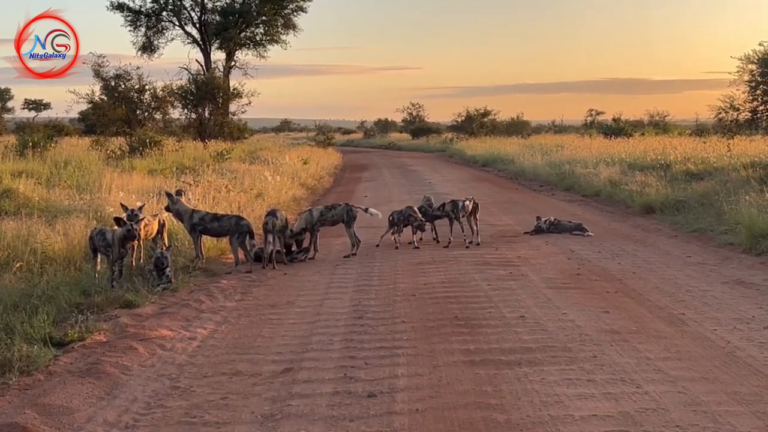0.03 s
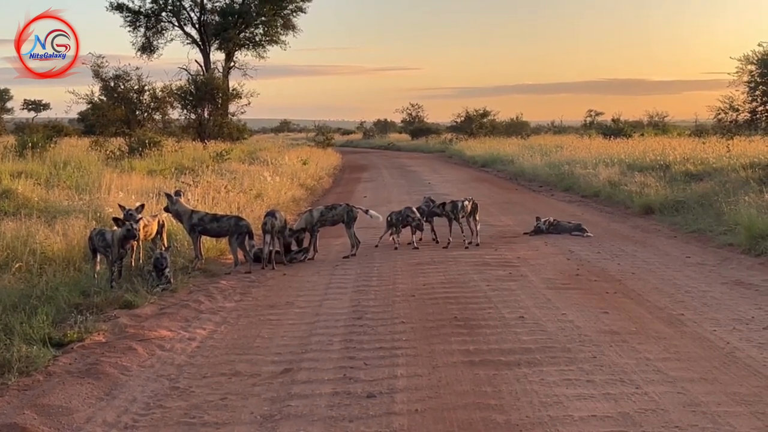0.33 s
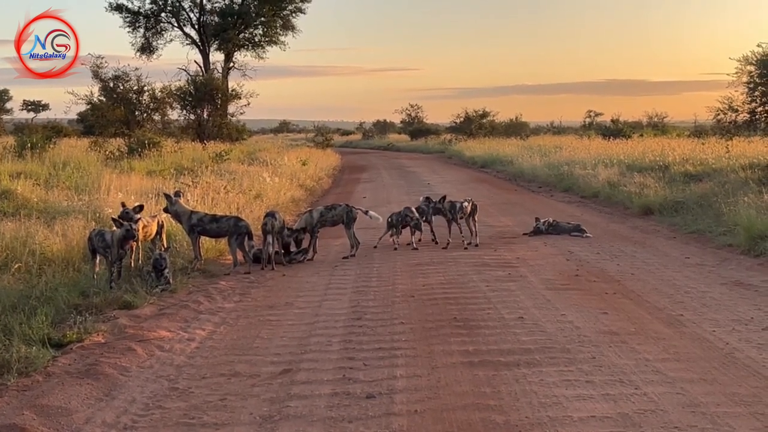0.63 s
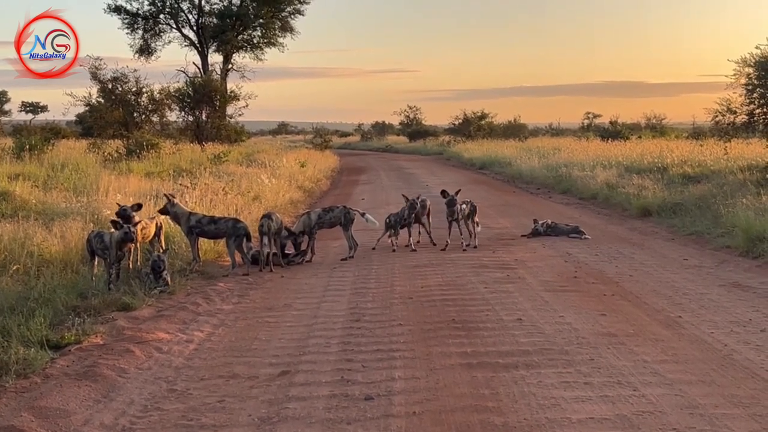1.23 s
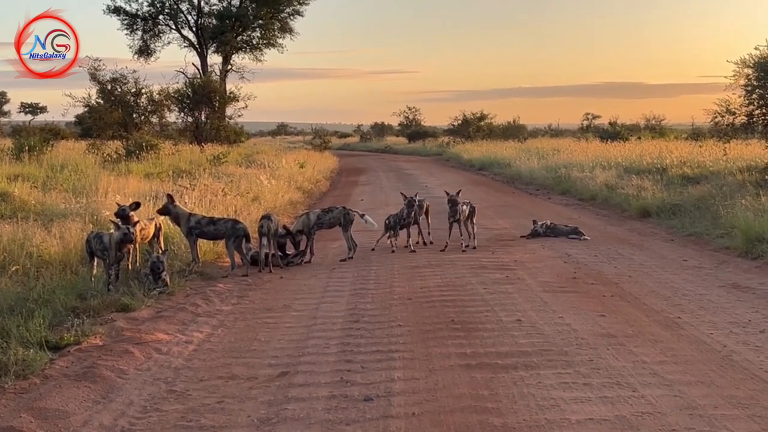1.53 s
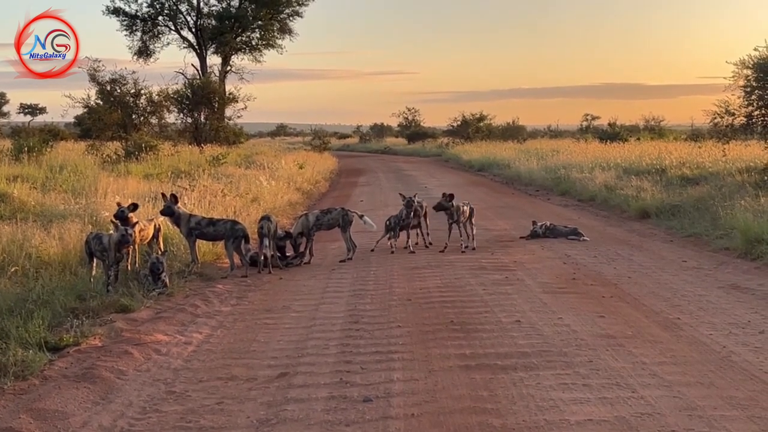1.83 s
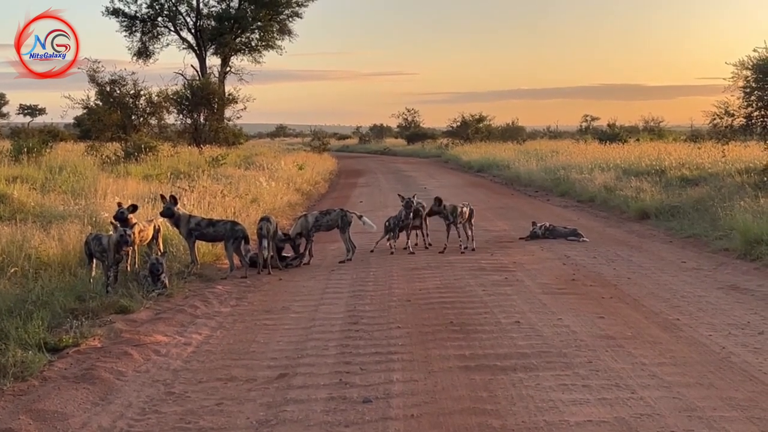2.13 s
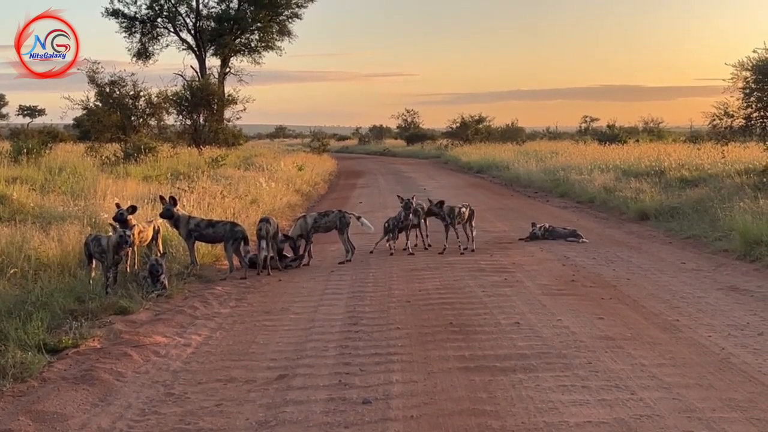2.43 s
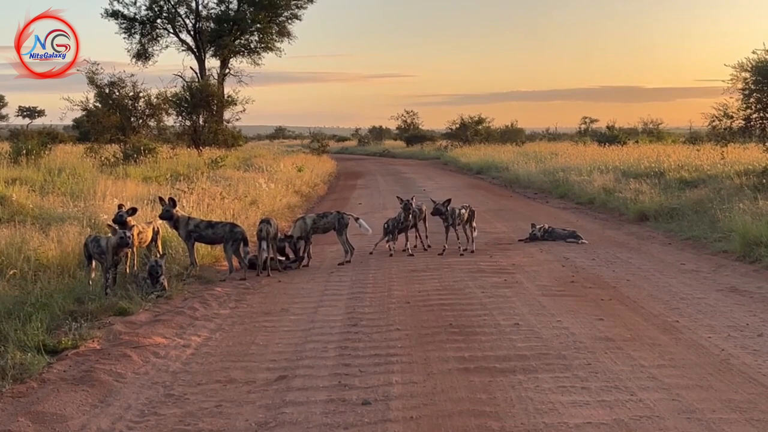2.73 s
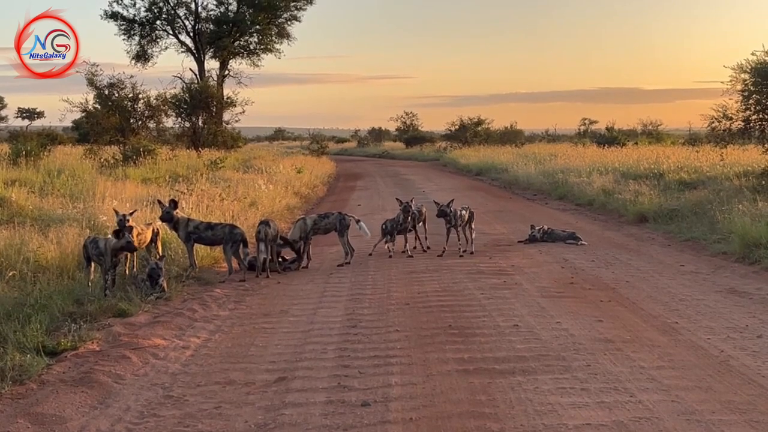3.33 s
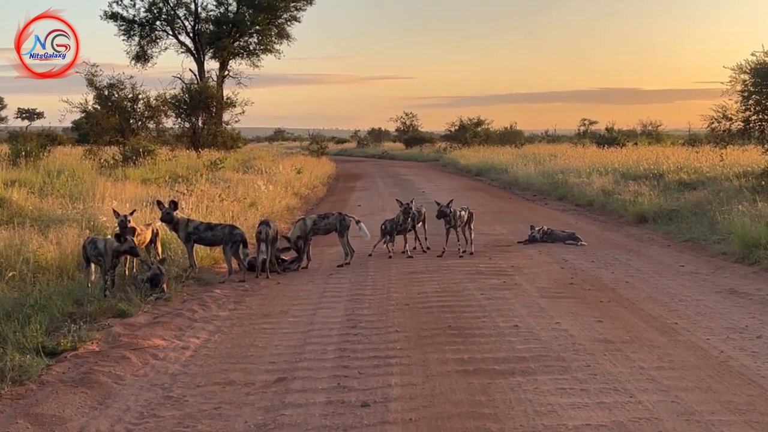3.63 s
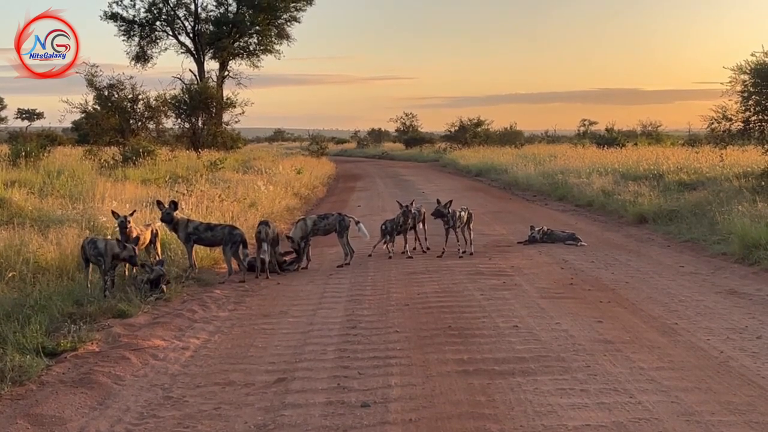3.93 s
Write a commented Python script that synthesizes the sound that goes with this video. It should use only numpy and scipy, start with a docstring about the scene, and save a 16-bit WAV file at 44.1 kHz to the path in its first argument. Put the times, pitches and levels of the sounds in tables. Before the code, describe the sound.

Birdsong with high falling whistles and quick trills in open grassland, with light wind.

```python
"""Birdsong in open grassland

Beside a dirt road, birds sing frequency-modulated tones: small slurred notes, fast trills, steep
falling whistles and one loud warble, with a few noisy rasps. Grass and bushes scatter each call back.
Under them lie a far chorus, faint wind and a low hum like that of an idling vehicle."""
import sys
import numpy as np
from scipy import signal
from scipy.fft import rfft, irfft
from scipy.io import wavfile
from scipy.ndimage import uniform_filter1d, map_coordinates

SR = 44100
rng = np.random.default_rng(int(sys.argv[2]) if len(sys.argv) > 2 else 0)


def int16_out(signal):
    """Quantize to a 16-bit WAV file."""
    q = np.round(np.clip(np.atleast_2d(signal).T, -1, 1) * 32767)
    wavfile.write(sys.argv[1], SR, q.astype(np.int16))


N = 176400

# Noise spectra. Each row: frequency in Hz, relative level in dB.
WIND_SPECTRUM = [(20, -43), (42, -7.5), (64, 2.5), (100, -3.5), (266, -19), (440, -19.5), (650, -21.5),
                 (1070, -25.5), (2030, -29.5), (3080, -31), (3700, -34.5), (4800, -29.5), (5700, -38.5),
                 (8160, -46.5), (10500, -50.5), (12700, -46.5), (14500, -53), (15600, -77)]
MURMUR_SPECTRUM = [(300, -19), (650, -14), (850, 7), (1050, -6.5), (1500, -31)]
RASP_SPECTRUM = [(300, -34), (1500, -4.5), (2600, -5), (3400, 6), (4000, 3.5), (4700, 0), (6800, -4.5),
                 (8500, -20), (15000, -26)]
SHEEN_SPECTRUM = [(9000, -40), (11000, -12), (12300, 18), (14200, -8), (15600, -18)]
# Swells of the midrange murmur. Each row: time in seconds, level in dB.
MURMUR_LEVEL = [(0, -56.5), (.3, -56), (.75, -65), (.9, -55), (1.149, -66), (1.46, -56.5), (1.9, -64.5),
                (2.35, -59), (2.6, -64), (3.0, -58.5), (3.4, -67.5), (4, -61.5)]
# Registers of the far chorus. Each row: centre pitch in Hz, spread as a fraction of it,
# notes per second, note length in seconds, level of the register in dB.
CHORUS_REGISTERS = [(4710, 0.0657, 70, 0.0177, -64.5), (3000, 0.3, 26, .08, -65),
                    (6000, 0.121, 110, 0.0203, -74)]
# Scratchy calls. Each row: start in seconds, length in seconds, level in dB.
RASP_CALLS = [(0.046, 0.049, -48), (0.326, 0.065, -51), (1.057, 0.024, -47.5), (1.321, 0.025, -49)]
# Slurs and thin high notes. Each row: start and length in seconds, first, middle and last pitch in Hz,
# level in dB.
SLURRED_NOTES = [ (.06, 0.049, 3520, 3290, 2860, -54.5), (.198, 0.031, 4740, 4390, 3900, -52.5),
                 (.345, 0.11, 3450, 2940, 2630, -60.5), (.465, .065, 3080, 3144, 2900, -55.5),
                 (.53, 0.035, 3530, 3480, 3300, -46.5), (.62, 0.075, 3120, 2755, 2570, -57.5),
                 (.654, 0.02, 3900, 3650, 3490, -51), (.70, 0.24, 2410, 2220, 2280, -67),
                 (.752, 0.043, 4730, 4210, 3970, -53.5), (.915, 0.063, 3980, 3440, 2780, -53.5),
                 (2.286, 0.027, 2480, 2390, 2310, -57.5), (2.505, 0.06, 3760, 3560, 3230, -55.5),
                 (2.585, 0.11, 2278, 2336, 2216, -56.5), (2.592, 0.033, 2200, 2900, 2930, -55.5),
                 (2.68, .13, 2290, 2130, 1900, -63.5), (2.852, 0.0597, 3420, 3240, 3000, -59.5),
                 (2.905, 0.076, 3070, 2910, 2520, -55), (3.005, 0.076, 2270, 2430, 2520, -59),
                 (3.112, .115, 3000, 3540, 3380, -53), (3.22, 0.1, 3950, 3790, 3300, -61.5),
                 (3.268, 0.043, 3480, 3380, 2870, -51.5), (3.335, 0.095, 3110, 2880, 2650, -58),
                 (3.432, .022, 2380, 2400, 2600, -59), (3.945, .09, 3050, 2850, 2870, -57.5),
                 (3.957, 0.04, 4970, 4300, 3375, -56)]
THIN_NOTES = [(0.186, 0.029, 5600, 6480, 6600, -58.5), (0.386, 0.045, 6000, 7000, 7000, -55.5),
              (0.531, 0.033, 6000, 7250, 5900, -57.5), (0.576, 0.034, 6100, 7130, 6050, -64),
              (0.652, 0.046, 6000, 6700, 5800, -64), (1.376, .01, 5800, 6260, 6870, -61),
              (1.456, 0.02, 6900, 7100, 7300, -60.5), (1.573, 0.012, 5800, 6260, 6800, -61),
              (1.631, 0.032, 6800, 7100, 7000, -61.5), (1.645, .024, 5800, 5800, 6140, -59),
              (1.781, 0.011, 5700, 6400, 6850, -62), (1.969, 0.03, 7400, 6000, 7530, -60.5),
              (2.055, 0.04, 7700, 6000, 7460, -61.5), (2.188, 0.011, 5700, 6580, 7060, -60),
              (2.389, 0.012, 5700, 6640, 7340, -61), (2.422, 0.01, 7900, 7340, 6400, -64),
              (2.716, 0.04, 5880, 6570, 6050, -66), (3.22, 0.16, 7600, 6710, 6210, -68)]
# Rising twitters. Each row: start and length in seconds, top pitch in Hz, level in dB.
TWITTER_NOTES = [(1.598, 0.033, 3460, -57), (1.707, 0.03, 3350, -53.5), (1.763, 0.019, 3660, -51),
                 (1.788, 0.017, 3550, -55), (1.828, .022, 3910, -57), (1.868, 0.044, 3370, -52),
                 (1.921, 0.041, 3645, -52.5), (1.988, 0.03, 3600, -54.5), (2.062, 0.031, 3400, -52.5),
                 (2.11, 0.028, 3590, -53.5)]
# Trills. Each row: start in seconds, number of chips (rounded in use), period and chip length in seconds,
# top and bottom pitch in Hz, level in dB.
TRILL_RUNS = [(0.144, 4, 0.03, 0.02, 5080, 4650, -51), (0.377, 11.7, 0.017, 0.021, 4560, 3800, -53.5),
              (0.432, 5.1, 0.033, 0.022, 4990, 4650, -52), (0.784, 3.9, 0.034, 0.019, 5040, 4650, -49),
              (1.491, 3, 0.033, 0.027, 5000, 4790, -57), (1.663, 10, .0193, 0.0118, 5370, 4300, -53.5),
              (2.051, 9.9, 0.021, 0.017, 4910, 4220, -60.5), (2.125, 3.2, 0.031, 0.022, 5050, 4690, -56.5),
              (2.7953, 9.9, 0.02, 0.017, 4670, 3950, -56.5), (2.8485, 7.2, .0209, 0.013, 5470, 4560, -57.5),
              (3.141, 12, 0.019, .014, 5020, 4640, -58.5), (3.4, 9.3, 0.021, 0.014, 4720, 3750, -54.5),
              (3.432, 6.7, 0.041, 0.019, 5040, 4770, -57), (3.695, 14, 0.018, 0.0109, 5310, 4560, -54),
              (3.725, 7.3, 0.032, 0.029, 5010, 4600, -55.5)]
# Steep whistles, and flatter ones that drop at the end. Each row: start and length in seconds,
# base level in dB.
STEEP_WHISTLES = [(.572, 0.14, -38), (.828, 0.15, -34), (1.094, 0.14, -31.5)]
DROPPING_WHISTLES = [(2.212, 0.13, -52.5), (2.992, 0.15, -48.5), (3.79, .138, -50)]
# Their contours. Each row: fraction of the length, pitch in Hz, level in dB relative to the base.
STEEP_CONTOUR = [(0, 6780, -25), (.2, 6250, -26), (.3, 5940, -19), (.44, 5600, -13.5), (.6, 5180, -24),
                 (.74, 4940, -8), (.88, 4620, -6), (1, 4110, -11.5)]
DROPPING_CONTOUR = [(0, 5250, -10), (.3, 4790, -2.5), (.68, 4650, -5.5), (.79, 4520, -6), (1, 3750, -6.5)]
# The loud warble. Each row: time in seconds, centre pitch in Hz, pitch swing in Hz, level in dB.
WARBLE_CONTOUR = [(1.328, 2730, 324, -42), (1.341, 3017, 314, -38.5), (1.362, 2962, 302, -42),
                  (1.39, 3036, 266, -39), (1.429, 3102, 235, -38.5), (1.484, 3013, 200, -40.5),
                  (1.519, 3034, 141, -36), (1.535, 3060, 139.7, -52), (1.553, 2997, 138, -37.5),
                  (1.588, 2870, 108, -44)]

WIND_DB, HUM_DB, HUM_HZ, HUM_WAVER_HZ, HUM_FLUTTER = -45.5, -52, 82.85, 0.98, 0.24
EDGE_S, PITCH_JITTER, JITTER_PER_S, FLICKER_PER_S = 0.0017, 0.0057, 389, 195.3
TRILL_START_DB, TRILL_SLIP_S, TRILL_UNEVEN_DB, TRILL_DETUNE = -1.5, .0007, 1.3, 0.0077
WARBLE_RATE_HZ, WARBLE_CREST_S, WARBLE_SQUARENESS, WARBLE_STROKE_DB = 23.2, 0.0095, 1.17, 1.5
WARBLE_ECHO_S, WARBLE_ECHO_DB, NEAR_SCATTER_DB = 0.0044, -13.5, -3.5
SCATTER_DB, SCATTER_T60_S, FAR_DB, FAR_T60_S = -6, 0.16, -13.5, 0.92
SHEEN_DB, SHEEN_FOLLOWS_ABOVE_HZ, SHEEN_SMOOTH_S = -29.5, 7300, .004
CUTOFF_HZ = 15650


def amp(db):
    """Amplitude grows tenfold for every 20 dB."""
    return 10 ** (np.asarray(db) / 20)


def unit(x):
    """Normalisation scales a signal to rms 1."""
    return x / np.sqrt(np.mean(x ** 2) + 1e-20)


def add(mix, start, sound):
    """Superposition: a sound adds to the mix from its start in seconds."""
    part = mix[max(round(start * SR), 0):][:len(sound)]
    part += sound[:len(part)]


def drift(n, rate):
    """Random modulation: a smooth curve of size about 1 through `rate` random values a second."""
    knots = rng.standard_normal(1024)
    return map_coordinates(knots, [np.arange(n) * rate / SR], order=3, mode="wrap")


def noise(spectrum):
    """Spectral shaping gives white noise a colour, at rms 1."""
    hz, db = np.transpose(spectrum)
    bins_hz = np.fft.rfftfreq(N, 1 / SR)
    gain = amp(np.interp(np.log(bins_hz + 1), np.log(hz), db))
    return unit(irfft(rfft(rng.standard_normal(N)) * gain, N))


def whistle(hz, gain, flicker_db):
    """Phase is the integral of frequency: a slightly unsteady, near-pure tone follows a pitch curve."""
    n = len(hz)
    t = np.arange(n) / SR
    edges = np.clip(np.minimum(t, t[-1] - t) / EDGE_S, 0, 1)
    phase = 2 * np.pi * np.cumsum(hz * (1 + PITCH_JITTER * drift(n, JITTER_PER_S))) / SR
    flicker = amp(flicker_db * np.tanh(drift(n, FLICKER_PER_S)))
    return np.sqrt(2) * gain * edges * flicker * np.sin(phase)


def slur(length, first, middle, last, db):
    """A frequency glide: a parabola through three pitches, under an arched envelope."""
    u = np.linspace(0, 1, max(int(length * SR), 64))
    bow = (middle - (first + last) / 2) * (1 - (2 * u - 1) ** 2)
    arch = abs(np.sin(np.pi * u)) ** 0.26
    return whistle(first * (1 - u) + last * u + bow, amp(db) * arch, flicker_db=2)


def wind():
    """Moving air is broadband noise: a faint bed and a midrange murmur, each slowly modulated."""
    air = amp(WIND_DB + 0.93 * drift(N, 9)) * noise(WIND_SPECTRUM)
    swell_db = np.interp(np.arange(N) / SR, *np.transpose(MURMUR_LEVEL))
    return air + amp(swell_db + 2.85 * drift(N, 12)) * noise(MURMUR_SPECTRUM)


def hum():
    """Random frequency and amplitude modulation make a low tone waver like an idling engine."""
    phase = 2 * np.pi * np.cumsum(HUM_HZ + HUM_WAVER_HZ * drift(N, 11.75)) / SR
    return amp(HUM_DB) * unit((1 + HUM_FLUTTER * drift(N, 16)) * np.sin(phase))


def far_chorus():
    """Incoherent summation: random chirps of far birds blend in three registers."""
    out = np.zeros(N)
    for hz, spread, rate, length, db in CHORUS_REGISTERS:
        voices = np.zeros(N)
        for when, pitch, bend, faintness in rng.random((int(rate * N / SR), 4)):
            middle = hz * (1 + spread * (2 * pitch - 1))
            fall = 0.1033 * bend - .03
            chirp = slur(length, middle * (1 + fall), middle, middle * (1 - fall), -8 * faintness)
            add(voices, when * N / SR, chirp)
        out += amp(db) * unit(voices)
    return out


def rasps():
    """Aperiodic sound has no pitch: these calls are noise bursts that rise faster than they fade."""
    envelope, hiss = np.zeros(N), noise(RASP_SPECTRUM)
    for start, length, db in RASP_CALLS:
        u = np.linspace(0, 1, int(length * SR))
        add(envelope, start, amp(db) * np.sin(np.pi * u ** 0.53))
    return envelope * hiss


def small_notes():
    """Brief frequency glides make the slurs, thin notes and twitters of birds further off."""
    out = np.zeros(N)
    for start, *note in SLURRED_NOTES + THIN_NOTES:
        add(out, start, slur(*note))
    for start, length, top, db in TWITTER_NOTES:
        add(out, start, slur(length, .89 * top, .98 * top, top, db))
    return out


def trills():
    """A trill is a quasi-periodic pulse train: uneven falling chips reach full strength by mid-run."""
    out = np.zeros(N)
    for start, count, period, length, top, bottom, db in TRILL_RUNS:
        pitches = np.array([top, top + 0.353 * (bottom - top), bottom])
        for k, (slip, size, detune) in enumerate(rng.standard_normal((round(count), 3))):
            onset_db = TRILL_START_DB * max(1 - 2 * (k + .5) / count, 0)
            level = db + onset_db + TRILL_UNEVEN_DB * size
            chip = slur(length, *(pitches * (1 + TRILL_DETUNE * detune)), level)
            add(out, start + k * period + TRILL_SLIP_S * slip, chip)
    return out


def falling_whistles(calls, contour, flicker_db):
    """A downward frequency sweep: one bird repeats a contour, stretched to each call's length."""
    out = np.zeros(N)
    fraction, hz, db = np.transpose(contour)
    for start, length, base_db in calls:
        u = np.linspace(0, 1, int(length * SR))
        gain = amp(base_db + np.interp(u, fraction, db))
        add(out, start, whistle(np.interp(u, fraction, hz), gain, flicker_db))
    return out


def warble():
    """Interference: a whistle with a fast, narrowing vibrato beats against one close reflection."""
    out = np.zeros(N)
    times, centre, swing, db = np.transpose(WARBLE_CONTOUR)
    start = times[0]
    t = np.arange(start, times[-1], 1 / SR)
    cycle = 2 * np.pi * WARBLE_RATE_HZ * (t - start - WARBLE_CREST_S)
    vibrato = np.tanh(WARBLE_SQUARENESS * np.cos(cycle)) / np.tanh(WARBLE_SQUARENESS)  # dwells at turns
    hz = np.interp(t, times, centre) + np.interp(t, times, swing) * vibrato
    gain = amp(np.interp(t, times, db) + WARBLE_STROKE_DB * np.sin(cycle))  # downstrokes are louder
    call = whistle(hz, gain, flicker_db=.8)
    add(out, start, call)
    add(out, start + WARBLE_ECHO_S, amp(WARBLE_ECHO_DB) * call)
    return out


def scatter(x, t60):
    """Scattering from grass and bushes returns sparse reflections that decay 60 dB in t60 seconds."""
    t = np.arange(SR) / SR
    taps = rng.standard_normal(SR) * (rng.random(SR) < 2500 / SR)  # about 2500 reflections a second
    response = taps * (t > .002) * amp(-60 * t / t60)
    return signal.fftconvolve(x, response / np.linalg.norm(response))[:N]


def sheen(birds):
    """Amplitude modulation: faint noise in the top treble flickers with the highest calls."""
    highpass = signal.butter(2, SHEEN_FOLLOWS_ABOVE_HZ, "high", fs=SR, output="sos")
    treble = signal.sosfilt(highpass, birds)
    envelope = np.sqrt(abs(uniform_filter1d(treble ** 2, int(SHEEN_SMOOTH_S * SR))))
    return amp(SHEEN_DB) * envelope * noise(SHEEN_SPECTRUM)


def scene():
    """Direct and scattered song superpose on the background; near birds have a larger direct share."""
    background = wind() + hum()
    near = warble() + falling_whistles(STEEP_WHISTLES, STEEP_CONTOUR, flicker_db=3.5)
    drops = falling_whistles(DROPPING_WHISTLES, DROPPING_CONTOUR, flicker_db=2)
    further = drops + small_notes() + trills() + rasps()
    birds = near + further
    incident = amp(NEAR_SCATTER_DB) * near + further
    echoes = amp(SCATTER_DB) * scatter(incident, SCATTER_T60_S)
    echoes += amp(FAR_DB) * scatter(incident, FAR_T60_S)
    return (background + birds + echoes + sheen(birds) + far_chorus())[None]


def record(dry):
    """Band limiting: a steep low-pass filter removes the highest treble."""
    lowpass = signal.firwin(511, CUTOFF_HZ, window=("kaiser", 9), fs=SR)
    return signal.oaconvolve(dry, lowpass[None], "same")


dry = scene()
out = record(dry)
int16_out(out)
```